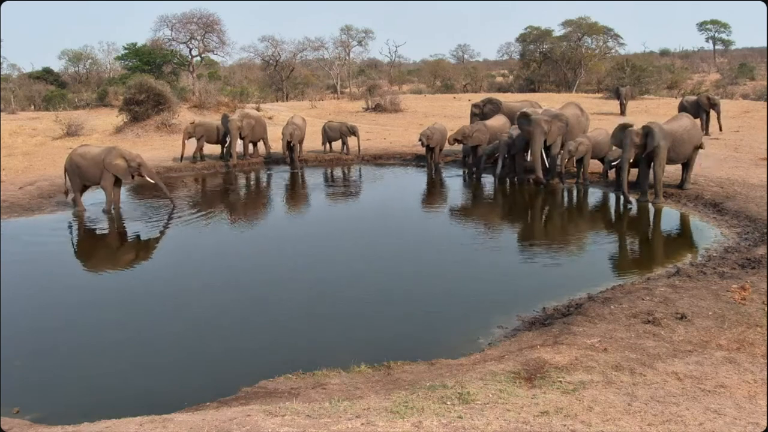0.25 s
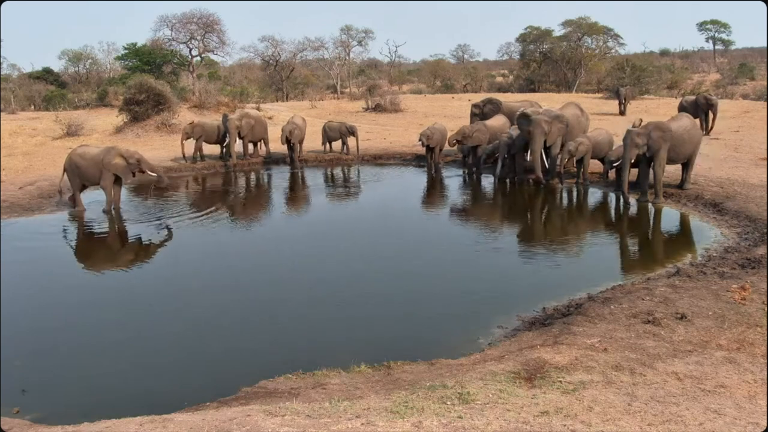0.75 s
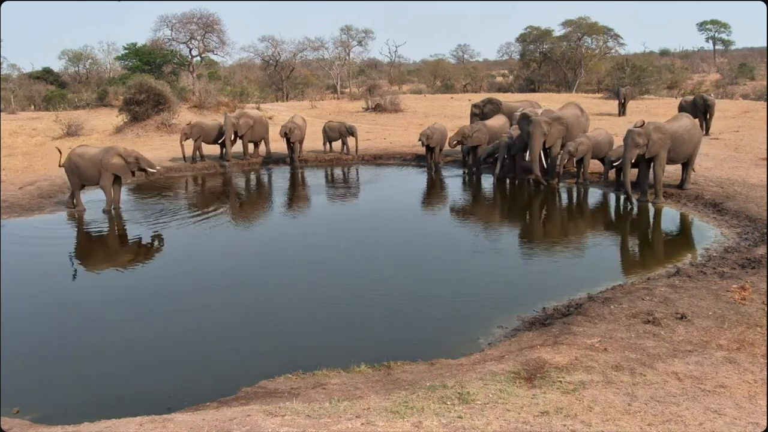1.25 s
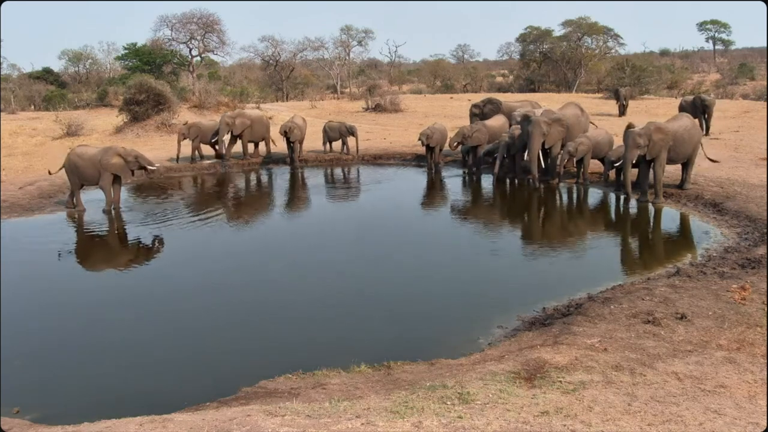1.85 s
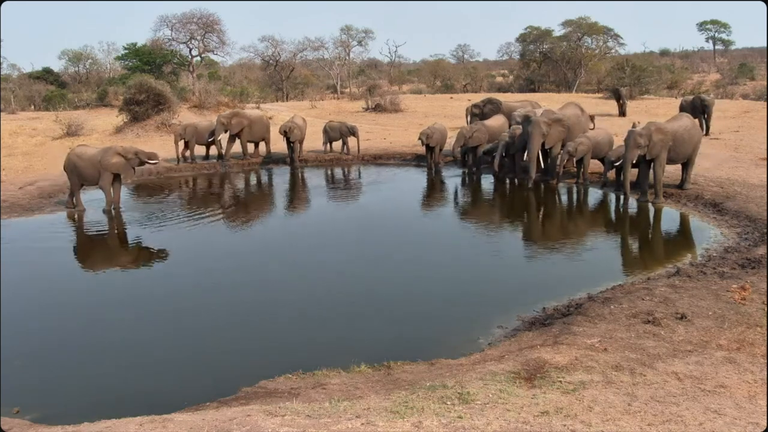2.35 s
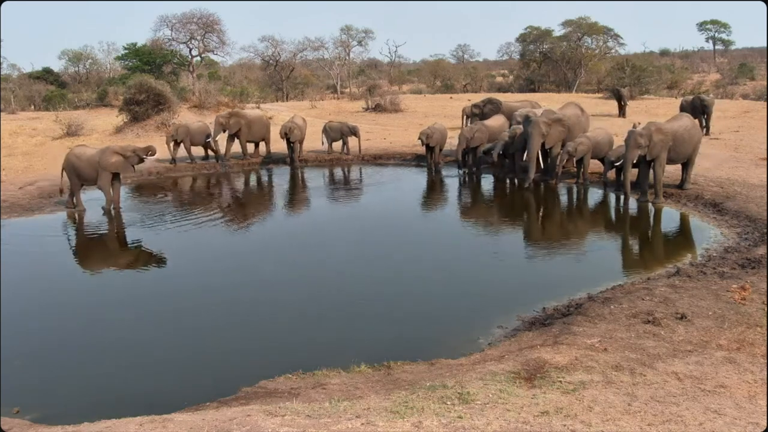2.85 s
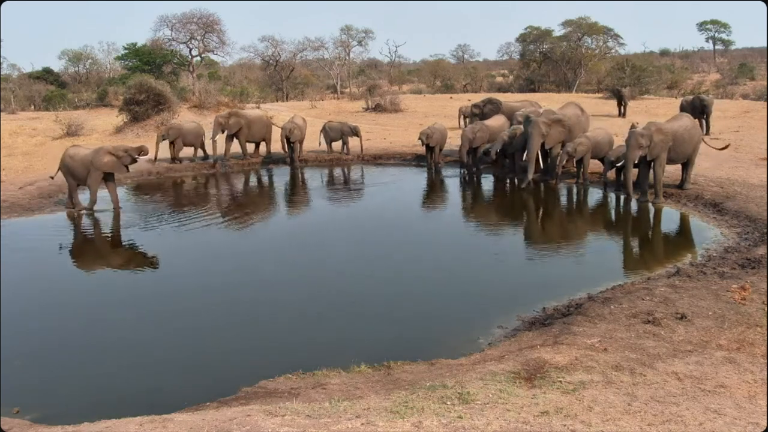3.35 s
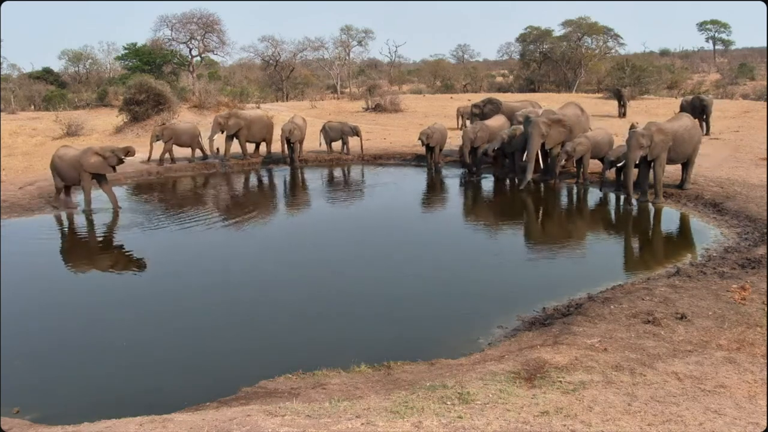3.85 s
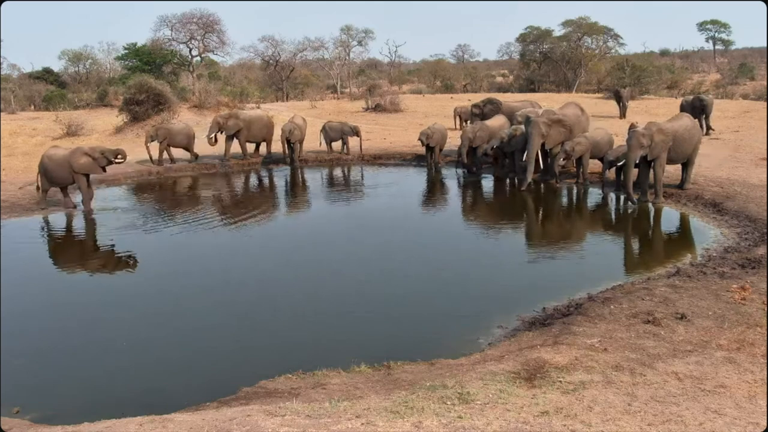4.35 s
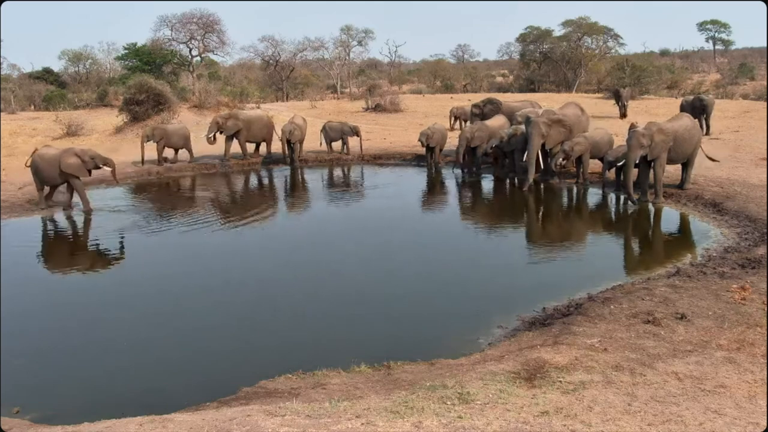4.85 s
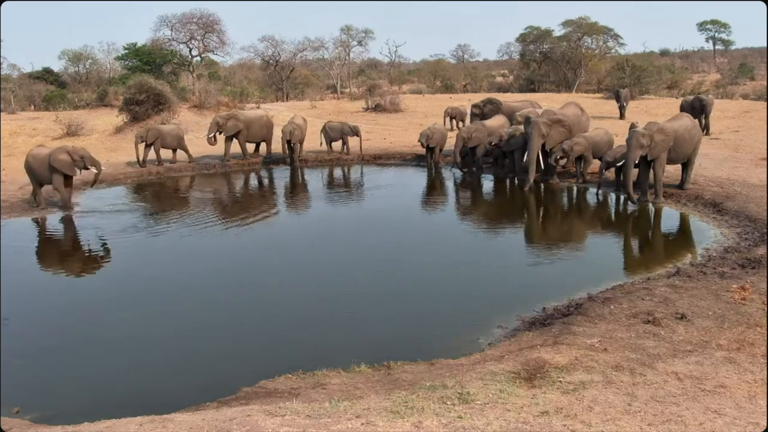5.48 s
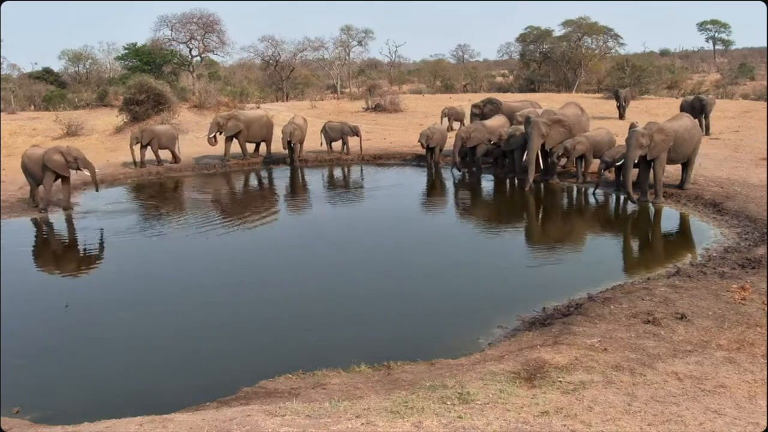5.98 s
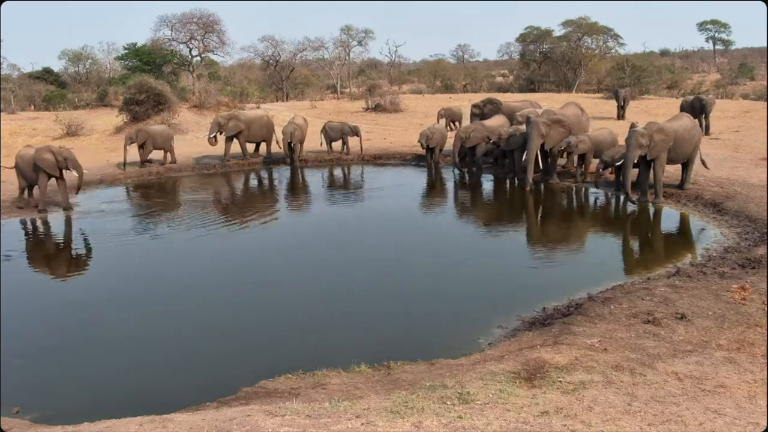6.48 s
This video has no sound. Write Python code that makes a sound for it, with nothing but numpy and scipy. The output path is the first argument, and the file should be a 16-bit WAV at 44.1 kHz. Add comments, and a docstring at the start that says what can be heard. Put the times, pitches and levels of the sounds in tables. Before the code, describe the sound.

An open-air waterhole heard in mono from across the pond, over a very faint hush and low hum. From the start, water falls from elephants' trunks in light patter with separate bright drops and gurgling slosh; a small flat smack lands near 0.8 seconds. Dripping and bubbling continue, swelling from about 1.9 to 2.4 into a fuller splash with a sharp crack, a dull thud and a hollow bubble at 2.1. Crisp double smacks and fine spray follow near 2.9, then a lull. At 3.8 to 4.1 a tight cluster of drops and slaps bursts out, with foamy churning. Around 4.4 rounded plops and slosh answer. From 5.1 to 5.5 a small bird gives short, falling whistles, clearest first and fading, amid a few drips. The last second is quiet: sparse trickles, tiny bubbles and faint ripples. Banks and bushes return only a thin, brief scatter.

```python
"""A waterhole in open bush, heard from across the pond: elephants drink and wade in the water.
Water spills from their trunks and patters on the surface as noise puffs and ringing drops; feet and trunks
slosh it into bubbles and foam, fat drops ping, trapped air rings and flat blows crack and thud.
A small bird gives short falling whistles. Faint coloured noise makes the hush, over a low hum, and
decaying noise tails make the scatter from banks and bushes."""
import sys
import numpy as np
from scipy import signal
from scipy.fft import rfft, irfft, next_fast_len
from scipy.io import wavfile
from scipy.ndimage import map_coordinates

SR = 44100
rng = np.random.default_rng(int(sys.argv[2]) if len(sys.argv) > 2 else 0)


def wav_out(sig):
    """Save sig, one row per channel (or a flat mono array), as 16-bit PCM at SR to the path in sys.argv[1]."""
    wavfile.write(sys.argv[1], SR, np.round(np.clip(np.atleast_2d(sig).T, -1, 1) * 32767).astype(np.int16))


N = 296352  # length in samples

# Spectral colours of the noises and swarms: freq_hz, gain_db
HUSH_COLOUR = [(20, 4.5), (35, -12), (50, 4), (90, 0.5), (200, 1), (400, 2), (900, -21), (1500, 7.5),
               (2300, 2), (3400, 6), (5500, -15), (7500, -0.5), (13500, -0.5)]
PATTER_COLOUR = [(250, -62), (700, -29), (1500, -17), (2200, -11.5), (2950, -11), (3400, 1.5), (3800, -2),
                 (4700, -7.5), (6000, -10), (7200, -19.5), (9500, -26.5), (13500, -31.5)]
WASH_COLOUR = [(250, -30), (550, -10), (680, -4.5), (920, -1.5), (1100, -1.5), (1400, 1), (1700, 2),
               (2100, -8), (2700, -5.5), (4000, -18), (8000, -61)]
CHURN_COLOUR = [(40, -24), (170, -16), (280, -11), (430, -6), (620, 4), (800, -8.5), (1400, -45)]
SMACK_COLOUR = [(200, -63), (900, -31), (2200, -21.5), (2900, -2), (3500, 3.5), (4500, 5), (6200, -5),
                (8000, -18), (13500, -36)]
CRACK_COLOUR = [(200, -27), (2200, -11), (3400, 2), (5000, 4.5), (8000, 6), (13500, -22)]
# Faint low hum: pitch_hz, level_db (centre of its wander)
HUM_TONES = [(50, -86), (75.2, -87.5), (150.4, -84.5)]
# Drips and ripples between the splashes, dying down as the herd settles: time_s, gain_db
RESTING_STIR = [(0, -0.5), (4.6, -0.5), (5.3, -6.5), (6.72, -8.5)]
# Shoves of feet and trunks: peak_s, rise_s and fall_s (per SWELL_DB), relative level_db,
# churn_db (deep churning relative to the slosh)
SHOVES = [(.02, 0.4, 0.76, -57.5, -2.5), (.63, 0.43, .15, -57, -3), (.79, 0.36, 0.1, -49.5, -4),
          (.98, 0.13, 0.097, -58, -4.5), (1.22, 0.33, 0.14, -56, -4.5), (1.42, 0.43, 0.088, -55.5, -4),
          (1.61, 0.3, 0.34, -54, -12), (1.96, 0.083, 0.13, -44, -12), (2.16, 0.25, 0.41, -43, -5.5),
          (2.36, 0.57, 0.25, -44, -19), (2.95, 0.33, 0.21, -53.5, -6.5), (3.39, 0.23, 0.29, -55.5, -4.5),
          (3.87, 0.26, 0.42, -43.5, -3), (4.2, 0.15, 0.17, -57.5, -2.5), (4.395, 0.067, 0.22, -46, -6),
          (4.54, .2, 0.31, -57, 3), (4.66, 0.15, 0.099, -55.5, -5), (4.97, .2, 0.15, -51.5, -13),
          (5.525, 0.057, 0.17, -55.5, -8), (5.62, .15, 0.33, -56, -7), (6.33, 0.35, 0.64, -60, -11),
          (6.55, .03, 0.36, -62, -15)]
# Trunkfuls falling on the pond: peak_s, rise_s and fall_s (per SWELL_DB), relative level_db,
# spray_db (fine spray relative to the patter)
TRUNKFULS = [(.03, 0.98, 0.54, -40, -5.5), (.6, 0.27, 0.55, -51, -4), (.91, 0.034, 0.16, -46, -6.5),
             (1.22, 0.32, 0.08, -47.5, -31), (1.38, 0.18, 1, -45.5, -20), (1.6, 0.36, 0.8, -45.5, -9.5),
             (1.955, 0.098, 1.0, -40, -28), (2.15, 0.11, .4, -37.5, -16.5), (2.31, 0.39, 0.26, -33, -22.5),
             (2.86, 0.052, 0.2, -37, -0.5), (2.96, .09, 0.34, -41, -5), (3.39, 0.27, 0.47, -60, 0),
             (3.832, 0.023, 0.3, -33.5, -6), (4.13, 0.11, 0.38, -47.5, -13), (5.25, 1, 0.63, -55, -1),
             (5.6, 0.26, 0.3, -51.5, -15), (5.96, .02, 0.22, -59.5, 1), (6.26, 0.25, 0.15, -57.5, -15),
             (6.68, 0.34, 0.49, -58, -12)]
# Single fat drops: start_s, relative level_db, pitch_hz of the ping
FAT_DROPS = [(0.062, -28, 4000), (0.184, -20.5, 3640), (0.2932, -22.5, 4130), (0.5786, -27.5, 3470),
             (0.7412, -27.5, 4300), (1.2007, -29.5, 3340), (1.2725, -29, 3870), (1.4851, -28.5, 3270),
             (1.5165, -25, 3160), (1.5529, -24.5, 3120), (1.7519, -19.5, 3630), (1.8442, -23, 3600),
             (2.1311, -13.5, 3420), (2.2234, -25, 3300), (2.2887, -28.5, 3600), (2.825, -21.5, 4490),
             (2.8584, -16.5, 4320), (2.8784, -17.5, 3540), (2.9614, -22.5, 4030), (3.0205, -25.5, 3630),
             (3.0864, -28, 3450), (3.1512, -30, 4940), (3.3867, -33, 4580), (3.4765, -29.5, 4500),
             (3.8212, -14.5, 3700), (3.8342, -12, 3600), (3.8935, -13, 3680), (3.92, -18.5, 3400),
             (4.0976, -17, 3600), (4.7925, -32.5, 3380), (5.0918, -34.5, 3360), (5.1509, -23, 3010),
             (5.1901, -29.5, 3060), (5.3148, -28.5, 3380), (5.4056, -34, 3600), (5.471, -35.5, 4070),
             (5.9609, -34, 3230), (6.2073, -34, 4900)]
# Large air pockets: start_s, pitch_hz at the start, relative level_db, life_s (time scale of the ring)
AIR_POCKETS = [(.428, 490, -50, 0.021), (.592, 1010, -35, .006), (0.624, 1360, -45, 0.015),
               (0.777, 426, -37, 0.019), (.92, 2530, -33.5, .003), (1.095, 475, -54, 0.019),
               (1.156, 1480, -39, .004), (1.597, 644, -36.5, 0.0099), (1.666, 688, -36, 0.0064),
               (2.09, 900, -39.5, 0.081), (2.157, 930, -21.5, .01), (2.165, 299, -44, 0.025),
               (2.303, 275, -45, .05), (3.124, 1450, -41, 0.0036), (3.502, 1430, -39, .004),
               (3.949, 820, -28, 0.002), (4.381, 515, -33.5, 0.0073), (4.428, 1280, -25, 0.0077),
               (4.455, 1300, -30.5, 0.0044), (4.841, 1860, -44, .006), (4.932, 1140, -39.5, 0.0033),
               (5.314, 1480, -38.5, 0.0033), (5.501, 1160, -48, 0.0085), (5.892, 1320, -46.5, .008),
               (6.323, 1080, -52, 0.019), (6.37, 1437, -43.5, 0.013), (6.448, 2100, -48, 0.0037),
               (6.564, 785, -48, 0.0088)]
# Heavy blows on the water: start_s, crack_peak_db, thud_peak_db
BLOWS = [(0.77, -26.5, -50.5), (2.1321, -24, -39), (2.859, -28, -65), (2.879, -26, -54), (3.894, -26, -48),
         (3.921, -34, -47)]
# Bird chips: start_s, length_s, start_hz, end_hz, relative level_db
BIRD_CHIPS = [(3.7, 0.065, 3350, 2780, -48), (3.94, 0.055, 3150, 2650, -41),
              (4.658, 0.021, 4460, 3430, -41), (5.117, 0.048, 3340, 2880, -22),
              (5.2415, 0.032, 3140, 2840, -25), (5.352, 0.034, 2960, 2740, -35),
              (5.462, 0.045, 2930, 2600, -47.5)]

SWELL_DB = 20  # a rise or a fall time spans this many dB
DRIP_DB, DRIP_SPRAY_DB = -57, -9  # resting drips, and their spray relative to them
RIPPLE_DB, RIPPLE_DEEP_DB = -65, -5.5  # resting ripples, and their churn relative to them
UNEVEN_DB = 1.5  # how strongly the sloshing flutters from moment to moment
SCATTER_DB, SCATTER_S = -3.5, .009  # droplets thrown up by small ticks: total level, decay time
# Weak, shallow pockets rise by this much per life; strong, deep ones hold their pitch
GLIDE_OCTAVES, SHALLOW_DB, DEEP_DB = 0.27, -49.5, -44
TOP_HZ = 13750  # upper band limit at the microphone


def amp(db):
    """Turn dB into a linear amplitude."""
    return 10 ** (np.asarray(db) / 20)


def unit(x):
    """Scale a sound to rms 1."""
    return x / np.sqrt(np.mean(x ** 2) + 1e-20)


def wobble(rate):
    """A smooth random curve, rate knots a second."""
    knots = rng.standard_normal(int(N * rate / SR) + 4)
    return map_coordinates(knots, [np.arange(N) * rate / SR])


def add(track, s, sound):
    """Mix a sound into the track at time s."""
    start = max(round(s * SR), 0)
    track[start:start + len(sound)] += sound[:max(N - start, 0)]


def coloured(x, points):
    """Causal minimum-phase filter with the gain of the (freq_hz, gain_db) points."""
    m = 2 * next_fast_len(len(x) // 2 + 2048)
    hz, db = np.transpose(points)
    gain = amp(np.interp(np.log(np.fft.rfftfreq(m, 1 / SR) + 1), np.log(hz), db))
    # Folding the cepstrum forward in time makes the filter causal
    cepstrum = irfft(np.log(gain), m)
    cepstrum[1:m // 2] *= 2
    cepstrum[m // 2 + 1:] = 0
    response = np.exp(rfft(cepstrum))
    return irfft(rfft(x, m) * response, m)[:len(x)]


def bubbles(per_s, low_hz, high_hz, cycles, rise, spread_db):
    """A swarm of damped, rising rings of random pitch and size, rms 1."""
    when, pitch, size, life = rng.random((int(per_s * N / SR), 4)).T[:, :, None]
    hz = low_hz * (high_hz / low_hz) ** pitch
    tau = cycles * (.5 + life) / hz
    k = np.arange(min(int(4 * cycles * SR / low_hz), 2400))
    age = k / SR / tau
    envelope = np.exp(-age) * (1 - np.exp(-10 * age))
    ring = np.sin(2 * np.pi * hz * tau * age * (1 + rise * age / 2)) * envelope
    strength = amp(-spread_db * np.log(np.maximum(size, .03)))
    places = (when * N).astype(int) + k
    return unit(np.bincount(places.ravel(), (strength * ring).ravel(), N)[:N])


def impacts(per_s, spread_db):
    """Millisecond puffs at random moments, a few much bigger than the rest, rms 1."""
    when, size = rng.random((int(per_s * N / SR), 2)).T
    power = amp(-spread_db * np.log(np.maximum(size, .02))) ** 2
    t = np.arange(SR // 100) / SR
    hits = np.bincount((when * N).astype(int), power, N)
    envelope = signal.fftconvolve(hits, np.exp(-t / 0.00098))[:N]
    return unit(np.sqrt(np.abs(envelope)) * rng.standard_normal(N))


def swells(rows, rest_db, rest_colour_db):
    """Each splash rises and dies evenly in dB over the resting stir: gains of its main part and its colour."""
    t = np.arange(N) / SR
    power = amp(rest_db + np.interp(t, *np.transpose(RESTING_STIR))) ** 2
    colour = power * amp(rest_colour_db) ** 2
    for s, rise, fall, db, colour_db in rows:
        distance = np.minimum(np.maximum((s - t) / rise, (t - s) / fall), 10)
        swell = amp(db - SWELL_DB * distance) ** 2
        power = power + swell
        colour = colour + swell * amp(colour_db) ** 2
    return np.sqrt(power), np.sqrt(colour)


def background():
    """Still air, a faint low hum and the herd's far, unbroken dribbling and lapping."""
    t = np.arange(N) / SR
    air = amp(-63.5) * unit(coloured(rng.standard_normal(N), HUSH_COLOUR))
    hum = sum(amp(db + 3.5 * wobble(2.96)) * np.sin(2 * np.pi * hz * t) for hz, db in HUM_TONES)
    dribble = amp(-71.5) * unit(coloured(impacts(per_s=440, spread_db=3.5), PATTER_COLOUR))
    laps = bubbles(per_s=64, low_hz=598, high_hz=1906, cycles=6.4, rise=0.071, spread_db=6.0)
    lapping = amp(-70) * unit(coloured(laps, WASH_COLOUR))
    return air + hum + dribble + lapping


def slosh():
    """Stirred water gurgles with bubbles; a hard surge merges them into foam; each shove has its own deep churn."""
    surge, depth = swells(SHOVES, RIPPLE_DB, RIPPLE_DEEP_DB)
    foaming = np.interp(20 * np.log10(surge), [-58, -42], [.3, .85])  # share of the power that is foam
    small = bubbles(per_s=240, low_hz=648.6, high_hz=2730, cycles=7.33, rise=.07, spread_db=3.5)
    small = unit(coloured(small, WASH_COLOUR))
    foam = unit(coloured(impacts(per_s=1800, spread_db=5.0), WASH_COLOUR))
    gurgle = np.sqrt(1 - foaming) * small + np.sqrt(foaming) * foam

    big = bubbles(per_s=200, low_hz=332.0, high_hz=744, cycles=4.7, rise=0.041, spread_db=4.0)
    rumble = unit(coloured(rng.standard_normal(N), CHURN_COLOUR))
    churn = unit(unit(coloured(big, CHURN_COLOUR)) + amp(-1.0) * rumble)
    flutter = amp(UNEVEN_DB * wobble(25))
    return flutter * (amp(0.58) * surge * gurgle + amp(-2.5) * depth * churn)


def spill():
    """Drops tap and ping, merging into a rush in strong flow; each trunkful has its own share of fine spray."""
    flow, mist = swells(TRUNKFULS, DRIP_DB, DRIP_SPRAY_DB)
    merged = np.interp(20 * np.log10(flow), [-55, -37], [.15, .45])  # share of the power in the smooth rush
    taps = impacts(per_s=800, spread_db=4.5)
    pings = bubbles(per_s=300, low_hz=2562, high_hz=7210, cycles=8.3, rise=0.018, spread_db=2)
    separate = unit(taps + amp(-10.5) * pings)
    water = np.sqrt(1 - merged) * separate + np.sqrt(merged) * rng.standard_normal(N)

    ticks = bubbles(per_s=40, low_hz=3180, high_hz=6800, cycles=2.6, rise=0.0093, spread_db=4)
    t = np.arange(SR // 20) / SR
    scatter = rng.standard_normal(len(t)) * np.exp(-t / SCATTER_S)
    droplets = unit(signal.fftconvolve(ticks, scatter)[:N])
    ticks = coloured(ticks + amp(SCATTER_DB) * droplets, CRACK_COLOUR)

    patter = unit(coloured(water, PATTER_COLOUR)) * amp(1.46 * wobble(70))
    water = unit(patter + amp(-8.5) * (1 - merged) * unit(ticks))
    # The part above 4.5 kHz is the spray, with its own level
    highpass = signal.butter(4, 4500, 'high', fs=SR, output='sos')
    spray = signal.sosfiltfilt(highpass, water)
    return amp(2.0) * flow * (water - spray) + (amp(7.5) * mist + amp(-17.5) * flow) * spray


def drops():
    """A fat drop smacks the water, leaves a short ping and scatters droplets."""
    track, t = np.zeros(N), np.arange(SR // 20) / SR
    # Brief contact, then the fainter scatter
    contact = t / .0006 * np.exp(1 - t / .0006) + amp(-15) * np.exp(-t / .008)
    for s, db, hz in FAT_DROPS:
        smack = coloured(rng.standard_normal(len(t)) * contact, SMACK_COLOUR)
        ping = np.sin(2 * np.pi * hz * t) * np.exp(-t / 0.0021) * (1 - np.exp(-t / 0.00035))
        hit = smack / np.linalg.norm(smack) + amp(-0.5) * ping / np.linalg.norm(ping)
        add(track, s, amp(db + 11.0) * hit / np.linalg.norm(hit))  # level set by total energy
    return track


def plops():
    """A large air pocket swells into its ring; a shallow one glides up as it nears the surface."""
    track, t = np.zeros(N), np.arange(SR // 4) / SR
    for s, hz, db, life in AIR_POCKETS:
        age = t / life
        swell = 2 * age * np.exp(.5 - 2 * age ** 2) + amp(-14.5) * age * np.exp(1 - age)
        rise = np.interp(db, [SHALLOW_DB, DEEP_DB], [GLIDE_OCTAVES, 0])
        pitch = hz * 2 ** (rise * np.minimum(age, 2))  # the glide stops after two lives
        add(track, s, amp(db - 4.5) * swell * np.sin(2 * np.pi * np.cumsum(pitch) / SR))
    return track


def slaps():
    """A flat blow cracks sharply and shoves the water with one low thud."""
    track, t = np.zeros(N), np.arange(SR // 20) / SR
    u = t / 0.0014
    thud = (1 - u) * np.exp(-u)
    for s, crack_db, thud_db in BLOWS:
        crack = coloured(rng.standard_normal(len(t)) * np.exp(-t / 0.00015), CRACK_COLOUR)
        add(track, s, amp(crack_db) * crack / np.abs(crack).max() + amp(thud_db) * thud)
    return track


def bird():
    """Falling whistles that start quickly, flutter a little and trail off."""
    track = np.zeros(N)
    for s, length, start_hz, end_hz, db in BIRD_CHIPS:
        u = np.linspace(0, 1, int(length * SR))
        phase = 2 * np.pi * np.cumsum(start_hz + (end_hz - start_hz) * u) / SR
        swell = np.interp(u, [0, .07, .4, .66, .82, 1], [0.018, 0.55, 0.68, 0.75, 0.24, 0.1])
        add(track, s, amp(db) * swell * np.sin(phase))
    return track * amp(1.3 * wobble(600))


def banks(x, t60):
    """The banks and bushes scatter back a thin noise tail that falls 60 dB in t60 seconds."""
    t = np.arange(SR // 2) / SR
    tail = rng.standard_normal(len(t)) * amp(-60 * t / t60) * (1 - np.exp(-t / 0.0037))
    return signal.fftconvolve(x, tail / np.linalg.norm(tail))[:N]


def scene():
    """Sum the pond, the bird, their scatter from the banks and the hush into one channel."""
    hush = background()
    water = slosh() + spill() + drops() + plops() + slaps()
    chips = bird()
    water_tail = amp(-11) * banks(water, t60=0.51)
    chip_tail = amp(-18) * banks(chips, t60=0.52)
    return (water + water_tail + chips + chip_tail + hush)[None]


def record(dry):
    """The microphone channel passes nothing at or above its band limit, a sharp cut in the spectrum."""
    m = next_fast_len(N + SR // 2)
    passed = np.fft.rfftfreq(m, 1 / SR) < TOP_HZ
    return irfft(rfft(dry, m) * passed, m)[..., :N]


dry = scene()
out = record(dry)
wav_out(out)
```